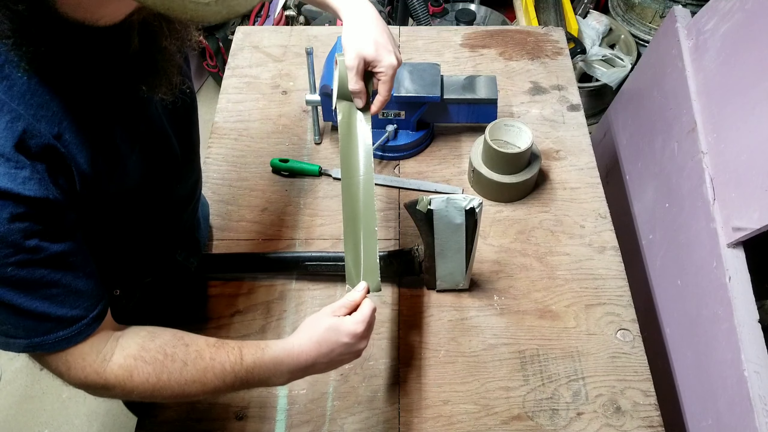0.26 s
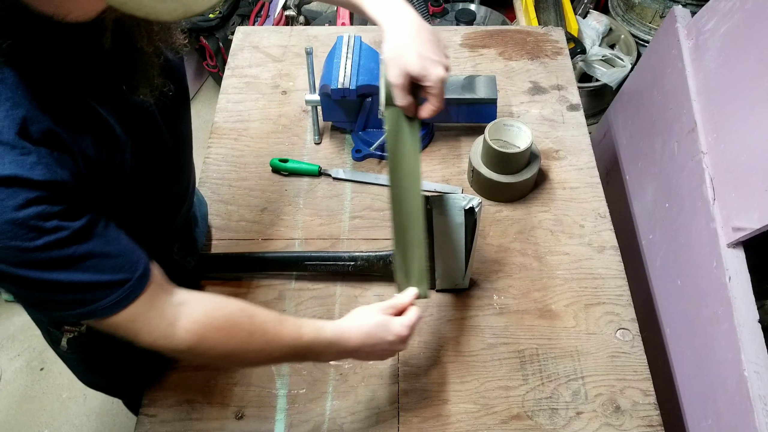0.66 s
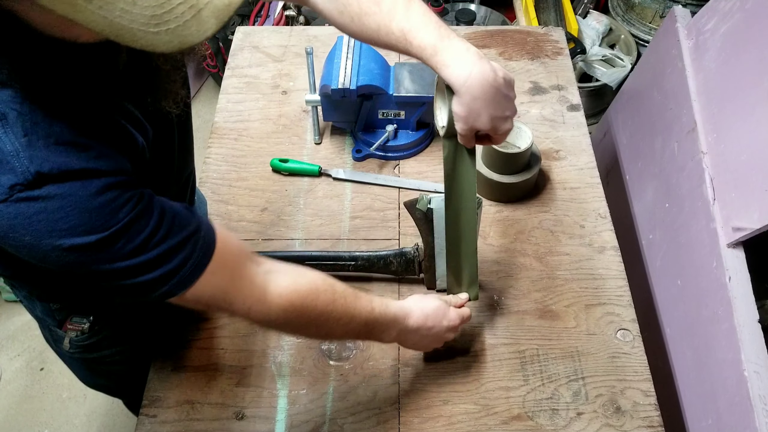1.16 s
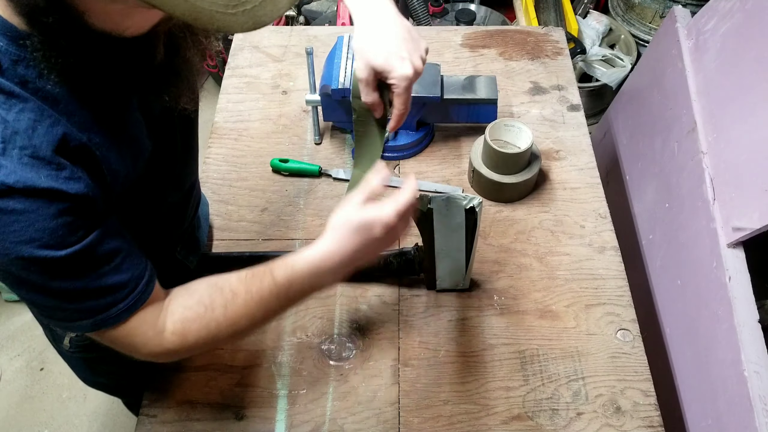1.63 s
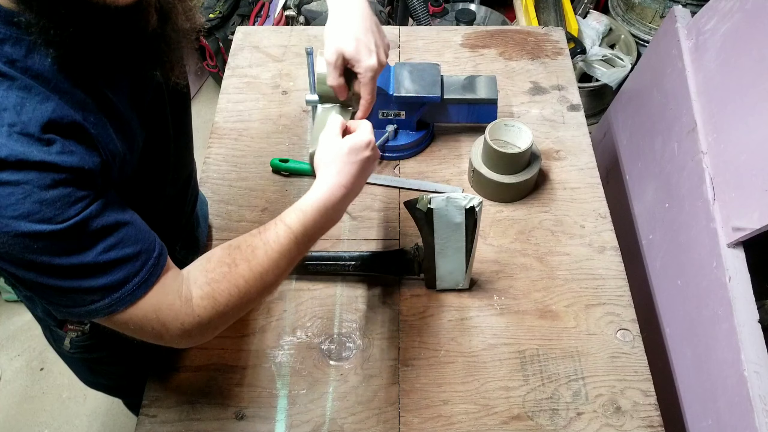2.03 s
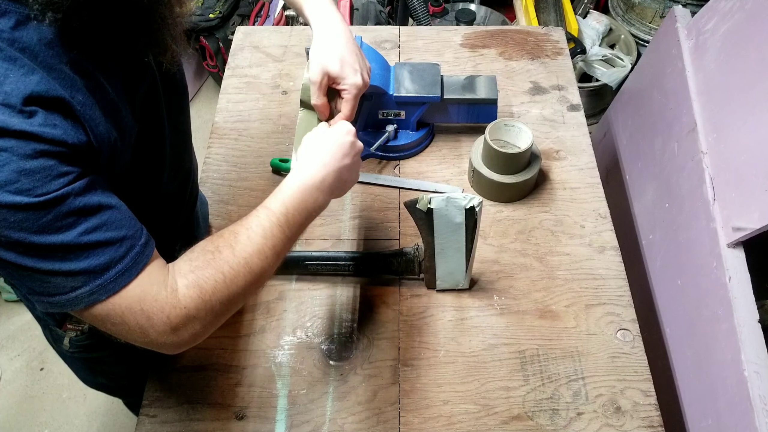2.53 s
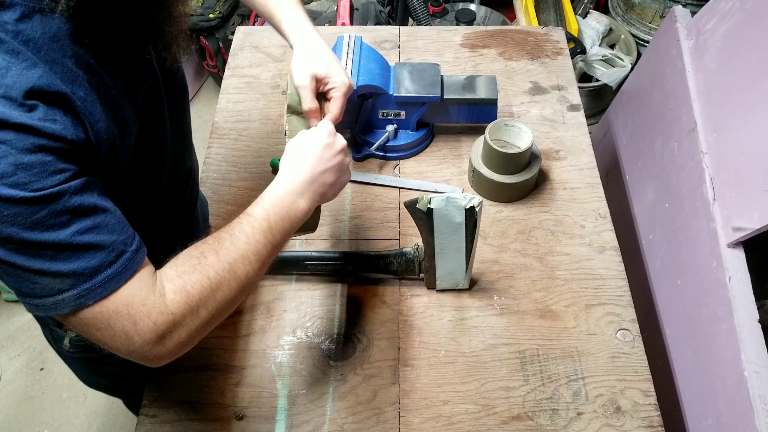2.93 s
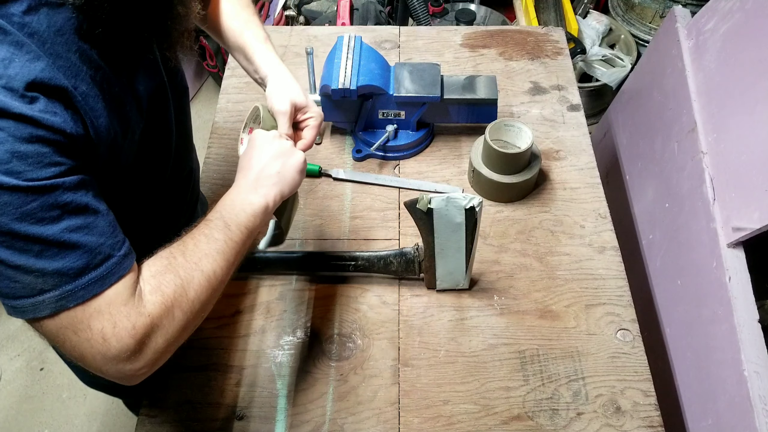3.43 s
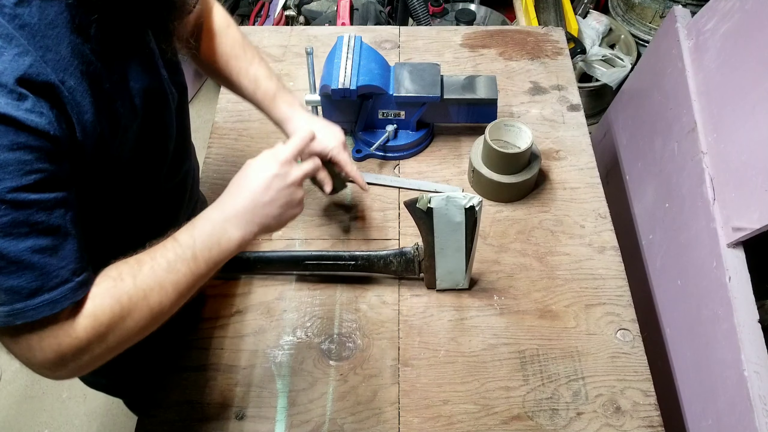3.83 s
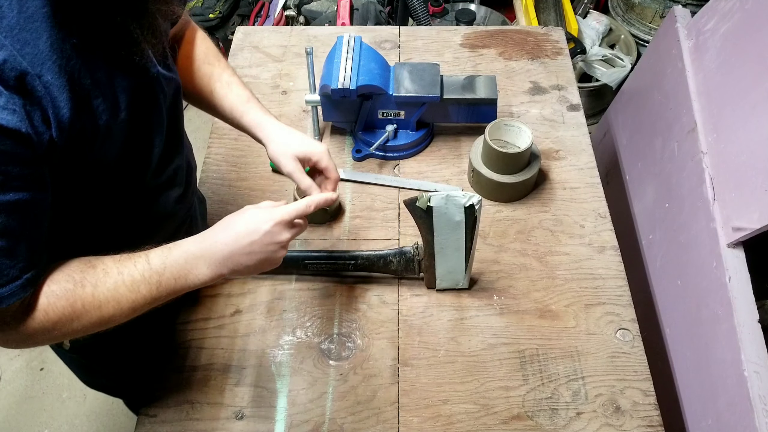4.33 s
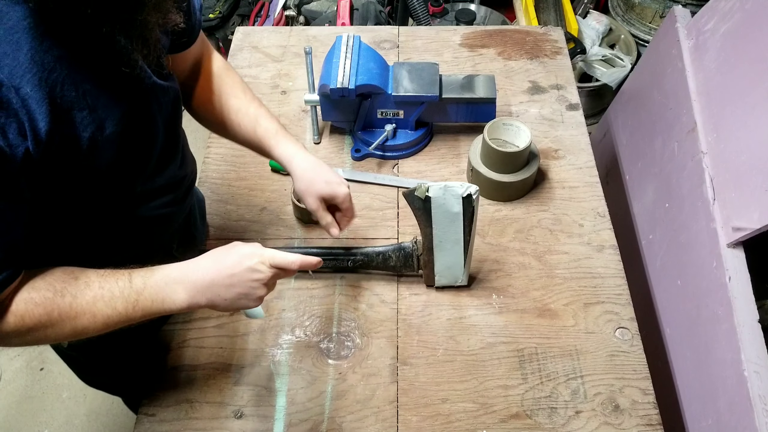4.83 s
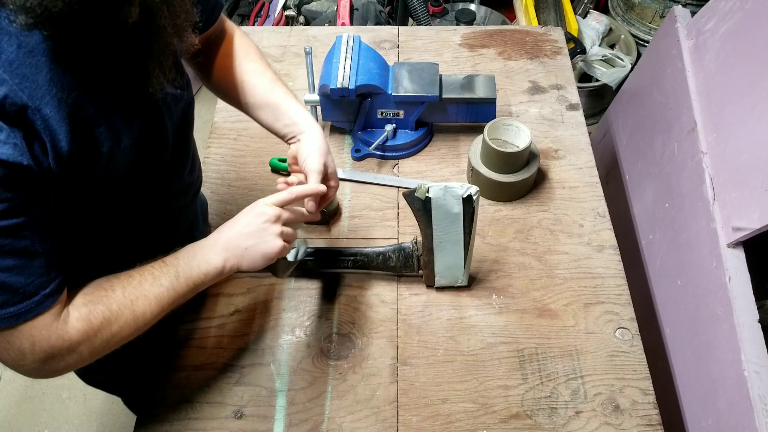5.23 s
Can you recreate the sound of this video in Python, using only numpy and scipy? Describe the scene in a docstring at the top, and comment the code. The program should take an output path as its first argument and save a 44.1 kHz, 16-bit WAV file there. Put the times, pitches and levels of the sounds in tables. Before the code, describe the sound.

A low hum and motor drone fill a small workshop, with a soft, distant clunk early on. Close by, fingers work at sticky duct tape, making quiet crackles before nicking its edge with a snap and ripping it quickly across. Right after, several hollow thumps land on the wooden workbench near the microphone. Another clunk sounds farther away, and the tape crinkles faintly again, all with a short room echo.

```python
"""A small workshop, microphones close to a wooden bench; mains hum and a low motor drone run throughout.
Near 0.9 s come two soft bumps and a clunk farther off. Duct tape is handled, crinkling and snapping.
At 3.2 s its edge is nicked with a sharp snap; at 3.5 s it tears across in one short rip.
The drone crests and ebbs, sinking in pitch. From 4 s dull bumps ring the wood, then come more distant
clunks and a last crinkle. The room answers each sound."""
import sys
import numpy as np
from scipy import signal
from scipy.fft import rfft, irfft, next_fast_len
from scipy.io import wavfile
from scipy.ndimage import map_coordinates

SR = 44100
rng = np.random.default_rng(int(sys.argv[2]) if len(sys.argv) > 2 else 0)


def dump_mix(stems):
    """Bounce the given channels to the path in sys.argv[1] as a 16-bit WAV at rate SR."""
    frames = np.atleast_2d(stems).T  # one column per channel
    limited = np.clip(frames, -1, 1)  # hard clip at full scale
    pcm = np.round(limited * 32767).astype(np.int16)
    wavfile.write(sys.argv[1], SR, pcm)


N = 241844
BAND_LIMIT_HZ = 15650


def amp(db):
    return 10 ** (np.asarray(db) / 20)


def unit_rms(x):
    return x / np.sqrt(np.mean(x ** 2) + 1e-20)


def along(points, hz):
    """Read (f/Hz, value) points along a log frequency axis."""
    freqs, values = np.transpose(points)
    return np.interp(np.log(hz + 1), np.log(freqs + 1), values)


def curve(points):
    """Join (t/s, value) points into one value per sample."""
    return np.interp(np.arange(N) / SR, *np.transpose(points))


def wobble(knots_per_s):
    """A smooth random curve."""
    knots = rng.standard_normal(int(N * knots_per_s / SR) + 4)
    return map_coordinates(knots, [np.arange(N) * knots_per_s / SR])


def swell(at_s, rise_s, fall_s):
    """An envelope that grows exponentially to 1 at at_s, then dies away."""
    t = np.arange(N) / SR - at_s
    return np.exp(np.minimum(t / rise_s, -t / fall_s))


def filtered(x, gain):
    """Zero-phase filter with amplitude response gain(hz)."""
    size = next_fast_len(N + SR // 2)
    return irfft(rfft(x, size) * gain(np.fft.rfftfreq(size, 1 / SR)), size)[..., :N]


def coloured(x, gain_db, size=2048):
    """Causal filter of energy 1, shaped like gain_db(hz)."""
    cepstrum = irfft(np.log(amp(gain_db(np.fft.rfftfreq(size, 1 / SR))) + 1e-6))
    cepstrum[1:size // 2] *= 2  # fold to minimum phase
    cepstrum[size // 2 + 1:] = 0
    pulse = irfft(np.exp(rfft(cepstrum)))
    return signal.fftconvolve(x, pulse / np.linalg.norm(pulse))[:len(x)]


def grains(n, per_s, spread_db):
    """Tiny fractures at random moments, of widely varying size; rms 1."""
    clicks = (rng.random(n) < per_s / SR) * rng.choice([-1, 1], n)
    sizes = amp(spread_db * np.clip(rng.standard_normal(n), -2, 2))
    return unit_rms(clicks * sizes)


def add(track, at_s, x):
    """Mix x into the track."""
    part = track[round(at_s * SR):][:len(x)]
    part += x[:len(part)]


def ring(modes, t, scatter_db):
    """Damped modes, struck at new strengths each time."""
    return sum(amp(db + scatter_db * rng.standard_normal() - 60 * t / t60) * np.sin(2 * np.pi * hz * t)
               for hz, db, t60 in modes)


# The workshop's decay: f/Hz, t60/s
ROOM_DECAY = [(150, .5), (400, .42), (1000, .33), (2800, .33), (7000, .27), (14000, .22)]
def in_room(x, pan_db, early_db, tail_db, alike):
    """Direct sound, quick bench reflections and the room's tail; alike is the share both sides hear."""
    hz, t, noise = signal.stft(rng.standard_normal((3, SR // 2)), SR, nperseg=256)
    decay = signal.istft(noise * amp(-60 * t / along(ROOM_DECAY, hz)[:, None]), SR, nperseg=256)[1]
    t = np.arange(decay.shape[1]) / SR
    tail = decay * (1 - np.exp(-(t / .012) ** 2))
    early = rng.standard_normal(decay.shape) * np.exp(-t / .006) * (t > .001)
    answer = amp(tail_db) * tail / np.linalg.norm(tail[0])
    answer += amp(early_db) * early / np.linalg.norm(early[0])
    answer = np.sqrt(alike) * answer[2] + np.sqrt(1 - alike) * answer[:2]
    reflected = signal.fftconvolve(x[None], answer, axes=1)[:, :N]
    sides_db = np.array([[pan_db], [-pan_db]])  # positive leans left
    return x * amp(sides_db / 2) + reflected * amp(sides_db / 4)


IDLE_DB, SWELL_DB, SWELL_AT_S = -69, -41.3, 3.75
def motor_level(grow_db_per_s=14, ebb_db_per_s=4.6):
    """The motor's level in dB: one long swell over a quiet idle."""
    t = np.arange(N) / SR - SWELL_AT_S
    swell_db = SWELL_DB + np.minimum(grow_db_per_s * t, -ebb_db_per_s * t)
    return 20 * np.log10(amp(IDLE_DB) + amp(swell_db))


# Building rumble and thin hiss, all around the microphones: f/Hz, level/dB
RUMBLE_SPECTRUM = [(20, -10), (40, -10), (60, 0), (190, 1), (260, -5.5), (420, -13.5), (700, -29),
                   (1500, -36), (4000, -55)]
HISS_SPECTRUM = [(300, 2), (700, -.5), (1500, -2.5), (4000, -8), (6500, -6.5), (8500, -16), (11000, -3),
                 (13000, 3), (15500, 2.5)]
def room_tone(boom_rise_s=.012, boom_fall_s=.18):
    """Hiss over a nearly mono rumble that grows with the motor and booms after each bump and clunk."""
    # For the same peak, a softer bump booms more.
    blows = [(s, amp(db - 29.5) * 1000 / hard_hz) for s, db, hard_hz in BENCH_BUMPS]
    blows += [(s, amp(db - 30.5)) for s, db in FAR_CLUNKS]
    boom_power = sum((size * swell(s + boom_rise_s, boom_rise_s, boom_fall_s)) ** 2 for s, size in blows)
    bed = amp(-68.3 + .36 * (motor_level() - IDLE_DB))
    low = rng.standard_normal(N) + .22 * rng.standard_normal((2, N))
    high = rng.standard_normal(N) + .8 * rng.standard_normal((2, N))
    rumble = unit_rms(filtered(low, lambda hz: amp(along(RUMBLE_SPECTRUM, hz))))
    hiss = unit_rms(filtered(high, lambda hz: amp(along(HISS_SPECTRUM, hz))))
    return np.sqrt(bed ** 2 + boom_power) * rumble * amp([[-1], [1]]) + amp(-74.2) * hiss


# The motor slowing in the background: t/s, f/Hz
MOTOR_PITCH = [(0, 87), (2.5, 86.2), (3.8, 84), (4.8, 77.6), (5.48, 75.3)]
# Mains hum in the room: t/s, level/dB
MAINS_LEVEL = [(0, -56), (0.8, -57), (1.8, -55.5), (2.6, -50.5), (3.4, -53), (3.8, -57), (4.35, -51),
               (5.48, -54.5)]
def hum(mains_hz=120, low_tone_hz=58.7):
    """A little to the right: a motor drone with its octave, mains hum and a faint low tone."""
    t = np.arange(N) / SR
    phase = 2 * np.pi * np.cumsum(curve(MOTOR_PITCH)) / SR
    drone = amp(motor_level() + .9 * wobble(6)) * (np.sin(phase) + amp(-24) * np.sin(2 * phase))
    mains = amp(curve(MAINS_LEVEL) + .5 * wobble(5)) * np.sin(2 * np.pi * mains_hz * t)
    low_tone = amp(-66.5 + 2 * wobble(4)) * np.sin(2 * np.pi * low_tone_hz * t)
    return np.sqrt(2) * (drone + mains + low_tone) * amp([[-1.3], [1.3]])


# Knocks out in the room: t/s, relative level/dB
FAR_CLUNKS = [(0.904, -21), (0.955, -38), (4.648, -13.5), (4.692, -33), (4.785, -29)]
# Their rattle: f/Hz, level/dB
RATTLE_SPECTRUM = [(30, -18), (70, 10), (190, 6), (280, 1), (450, 3), (750, 0), (1500, -11), (3000, -24),
                   (5000, -32), (7000, -39), (10000, -75)]
# Their ringing: f/Hz, level/dB, t60/s
KNOCK_MODES = [(154, -2, .6), (200, -3, .3), (361, -6, .4), (505, -9, .2), (785, -5.5, .12),
               (1060, -3.5, .1), (1410, -14, .11), (1960, -8, .11), (2260, -15, .08), (2630, -20, .12),
               (2830, -19, .12), (3080, -16, .09), (3890, -20, .1)]
def clunks():
    """Hard knocks far from the microphones: a brief rattle and ringing modes; weak ones are duller."""
    out, t = np.zeros(N), np.arange(SR // 2) / SR
    for s, db in FAR_CLUNKS:
        rattle = grains(len(t), per_s=3000, spread_db=3) * np.exp(-t / .02)
        rattle = coloured(rattle, lambda hz: along(RATTLE_SPECTRUM, hz))
        ringing = ring(KNOCK_MODES, t, scatter_db=1.5)
        knock = (1 - np.exp(-t / .004)) * (amp(-1) * rattle + amp(-5) * ringing)
        edge_hz = min(16000 * amp(.5 * db), BAND_LIMIT_HZ)
        lowpass = signal.butter(2, edge_hz, fs=SR, output="sos")
        add(out, s, amp(db - 13) * signal.sosfilt(lowpass, knock))
    return out


# Dull blows on the bench: t/s, peak level/dB, hardness as treble cutoff f/Hz
BENCH_BUMPS = [(0.825, -43, 140), (0.868, -44, 150), (1.787, -51, 2200), (4.043, -16.3, 800),
               (4.197, -15.3, 1100), (4.3235, -21, 1000), (4.425, -31, 500), (4.487, -32, 350),
               (4.565, -37, 220), (4.612, -38, 140)]
# The wood's resonances: f/Hz, level/dB, t60/s
BENCH_MODES = [(154, -19, .45), (255, -17, .1), (310, -3.5, .06), (345, .5, .065), (505, -6.5, .08),
               (610, -4, .06), (690, -5, .05), (830, -12, .06), (960, -12, .05), (1250, -22, .05)]
def bumps():
    """Soft blows nearby ring the wood and rattle what lies on it; a harder one reaches higher."""
    out, t = np.zeros(N), np.arange(SR // 2) / SR
    for s, db, hard_hz in BENCH_BUMPS:
        wood = ring(BENCH_MODES, t, scatter_db=1) * (1 - np.exp(-t / .002))
        rattle = amp(-4.5) * rng.standard_normal(len(t)) * np.exp(-t / .022)
        blow = coloured(wood + rattle,
                        lambda hz: -10 * np.log10((1 + (hz / hard_hz) ** 4) * (1 + (hz / 1500) ** 6)))
        add(out, s, amp(db) * blow / np.abs(blow).max())
    return out


# Tape dragging on the fingers, close up: start t/s, end t/s, level/dB
FINGER_DRAGS = [(2.10, 2.17, -56.5), (2.19, 2.255, -53.5), (2.46, 2.50, -59), (2.695, 2.735, -55),
                (3.75, 3.78, -55), (3.85, 3.89, -54), (4.902, 4.93, -60), (5.42, 5.47, -59)]
# Its rasp: f/Hz, level/dB
DRAG_SPECTRUM = [(100, -8), (300, 3), (600, -9), (1100, -8), (1600, -2), (2400, 0), (3500, -3), (6000, -9),
                 (9000, -17), (15000, -17)]
def drags():
    """The glue lets go of the skin in a rasp of small slips."""
    out = np.zeros(N)
    for start, end, db in FINGER_DRAGS:
        n = int((end - start) * SR)
        add(out, start, amp(db) * signal.windows.tukey(n, .4) * grains(n, per_s=1200, spread_db=5))
    return coloured(out, lambda hz: along(DRAG_SPECTRUM, hz))


# Each new grip on the tape: crest t/s, relative level/dB, rise/s, fall/s
FINGER_GRIPS = [(.45, -75, .05, .07), (1.37, -68, .03, .04), (1.59, -60, .015, .02), (1.745, -66, .008, .1),
                (2.16, -57, .08, .08), (2.5, -61.5, .2, .14), (3.06, -72, .15, .07),
                (3.285, -52, .015, .015), (3.53, -62, .025, .06), (3.845, -52, .012, .02),
                (4.1, -63, .12, .16), (5.37, -61, .05, .05), (5.46, -57, .04, .1)]
# The backing heard close up, in crinkles and snaps alike: f/Hz, level/dB
BACKING_SPECTRUM = [(100, -6), (250, 2), (700, -5), (1500, -9), (2600, -3), (4500, -2), (6700, 1),
                    (8500, -9), (11000, -1), (15500, -2)]
def crinkle(jolt_rise_s=.003, jolt_fall_s=.02):
    """The backing crackles faintly with each grip, and as each bump jolts the tape."""
    grips = sum(amp(db) * swell(s, rise, fall) for s, db, rise, fall in FINGER_GRIPS)
    jolts = sum(amp(db - 42) * swell(s + jolt_rise_s, jolt_rise_s, jolt_fall_s)
                for s, db, _ in BENCH_BUMPS)
    treble_lift = [(6000, 0), (12000, 2)]
    cracks = grains(N, per_s=1400, spread_db=5.5)
    crackle = coloured(cracks, lambda hz: along(BACKING_SPECTRUM, hz) + along(treble_lift, hz))
    return amp(-3) * (grips + jolts) * crackle


# Tape snapping near the microphones: t/s, relative level/dB, brightness/dB, length/s
TAPE_SNAPS = [(1.3805, -39, 1, .008), (1.599, -37, 2, .006), (2.002, -35.5, 2, .008),
              (2.1116, -33, 2, .004), (2.2265, -33, -1, .018), (2.320, -41, 3, .008),
              (2.4518, -34.5, 1, .012), (2.673, -45, 4, .012), (2.6955, -37.5, -7, .03),
              (3.1855, -12.2, 3.5, .012), (3.4505, -31, 12, .008), (3.468, -30, 14, .012),
              (3.5035, -25, 11, .008), (3.572, -7, 5, .0015), (3.5825, -7.5, 3, .0015),
              (3.726, -18, 3, .004), (3.8468, -22.5, -5, .016), (4.087, -39, -2, .015),
              (4.428, -25, -.5, .008), (4.9015, -35, -2, .022), (5.346, -40, 0, .02),
              (5.4213, -31, -1, .018)]
def snaps(attack_s=.0006):
    """A crease buckles in a dying burst of tiny cracks; a brighter one trades bass and body for treble."""
    out, t = np.zeros(N), np.arange(SR // 8) / SR
    for s, db, bright_db, length in TAPE_SNAPS:
        envelope = (1 - np.exp(-t / attack_s)) * np.exp(-2 * t / length)
        burst = envelope * grains(len(t), per_s=5000, spread_db=5.5)
        burst /= np.linalg.norm(burst) + 1e-9
        tilt = [(600, -1.4 * bright_db), (2500, -.8 * bright_db), (6000, 0), (12000, .7 * bright_db)]
        snap = coloured(burst, lambda hz: along(BACKING_SPECTRUM, hz) + along(tilt, hz))
        add(out, s, amp(db + 10) * snap)
    return out


# The tear, close to the microphones: start t/s, end t/s, level/dB, threads per second
TEAR = (3.536, 3.587, -21.3, 6000)
# Its breaking threads: f/Hz, level/dB
THREAD_SPECTRUM = [(150, -42), (350, -22), (650, -10), (1100, -3.5), (1600, -10), (2100, -3), (3000, -4),
                   (5500, -.5), (7400, -1), (8800, -6), (11500, .5), (15500, -.5)]
def rip(body_hz=1300):
    """The tear runs across the cloth, thread after thread; the growing flaps fill in the low tones."""
    start, end, db, threads_per_s = TEAR
    length = end - start
    t = np.arange(N) / SR - start
    pull = np.clip(t / .012, 0, 1) ** 2 * np.exp(-np.maximum(t - length, 0) / .01)
    breaks = pull * grains(N, threads_per_s, spread_db=3.6)
    threads = coloured(breaks, lambda hz: along(THREAD_SPECTRUM, hz))
    body = filtered(threads, lambda hz: 1 / (1 + (hz / body_hz) ** 4))
    flap_gain = 1.35 * np.clip(t / length, 0, 1) ** .9
    return amp(db) * (threads + (flap_gain - 1) * body)


def scene():
    """Tape close and left of centre, bumps through the bench ahead, clunks out in the room."""
    tape = in_room(snaps() + crinkle() + drags(), pan_db=4, early_db=-3, tail_db=-1.5, alike=.05)
    tear = in_room(rip(), pan_db=4.4, early_db=-2, tail_db=-9.5, alike=0)
    near = in_room(bumps(), pan_db=-.3, early_db=-16, tail_db=-8.5, alike=.9)
    far = in_room(clunks(), pan_db=-.3, early_db=-7, tail_db=-5.5, alike=.85)
    return tape + tear + near + far + hum() + room_tone()


def record(dry):
    """The microphone chain drops the deepest bass and cuts off steeply at its band limit."""
    dry = signal.sosfilt(signal.butter(3, 45, "highpass", fs=SR, output="sos"), dry)
    return filtered(dry, lambda hz: 1 / (1 + (hz / BAND_LIMIT_HZ) ** 140))


dry = scene()
out = record(dry)
dump_mix(out)
```